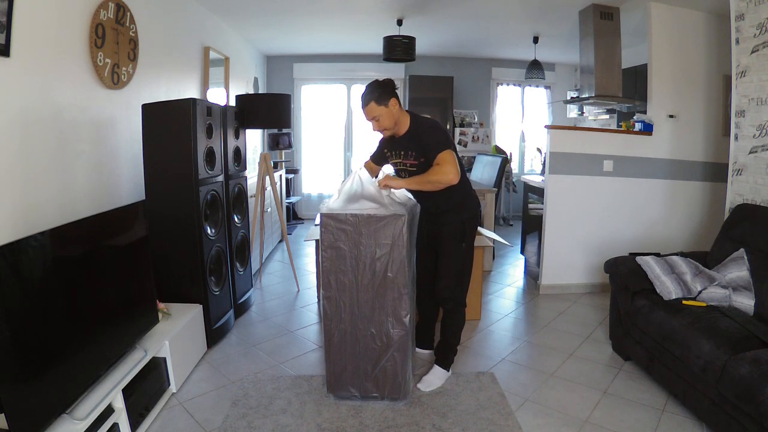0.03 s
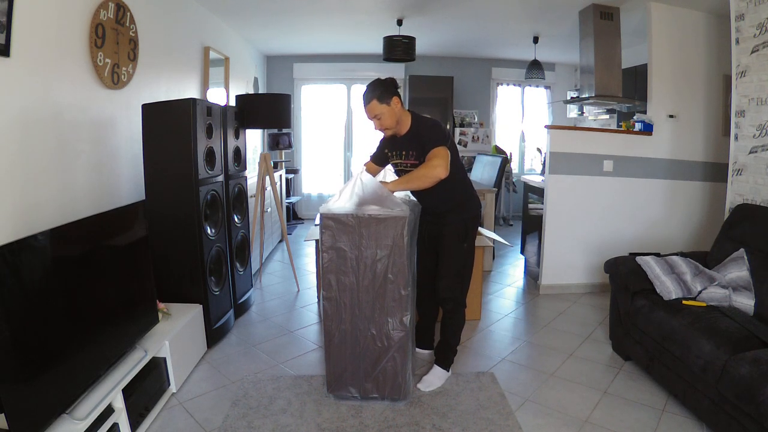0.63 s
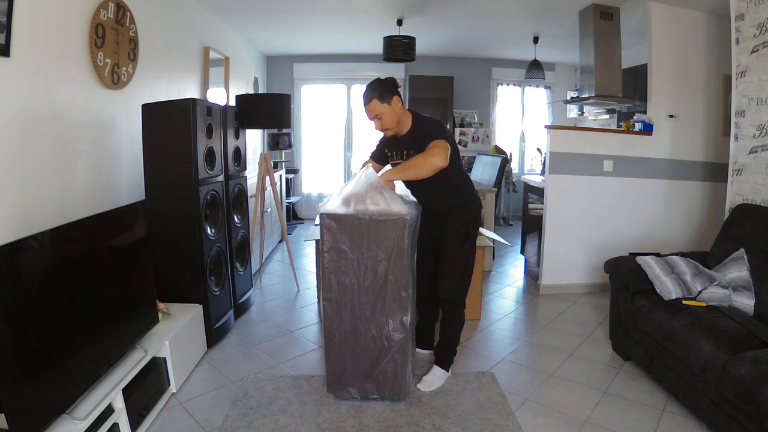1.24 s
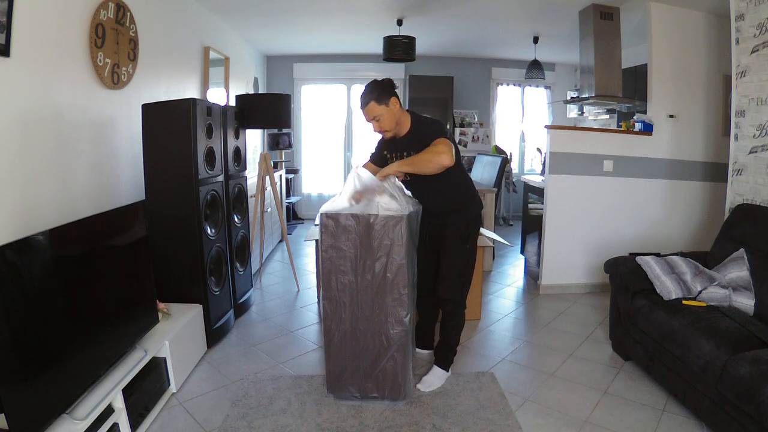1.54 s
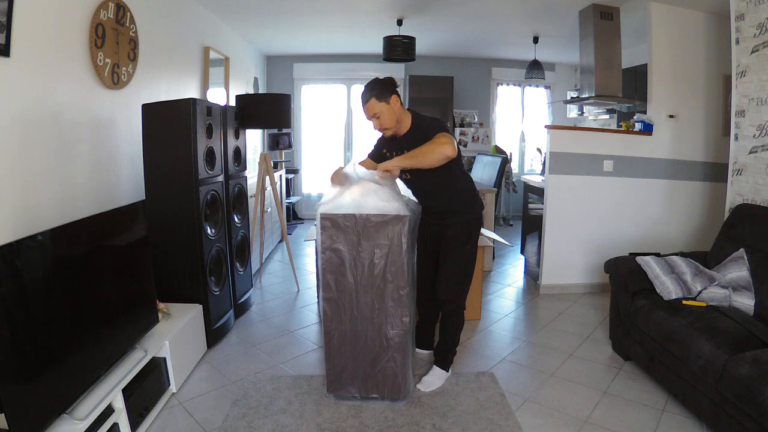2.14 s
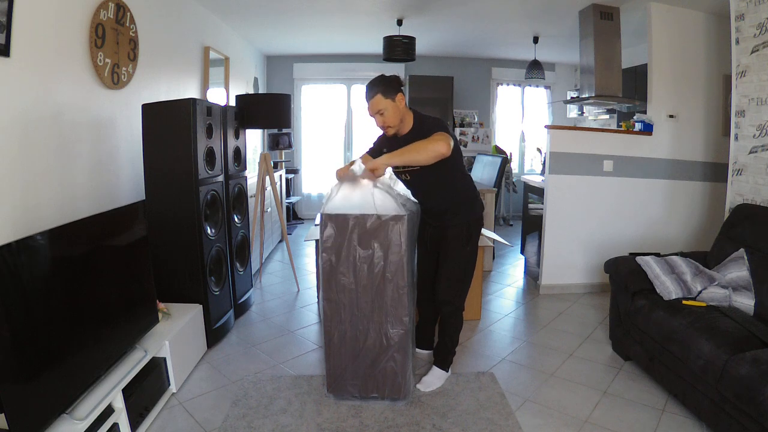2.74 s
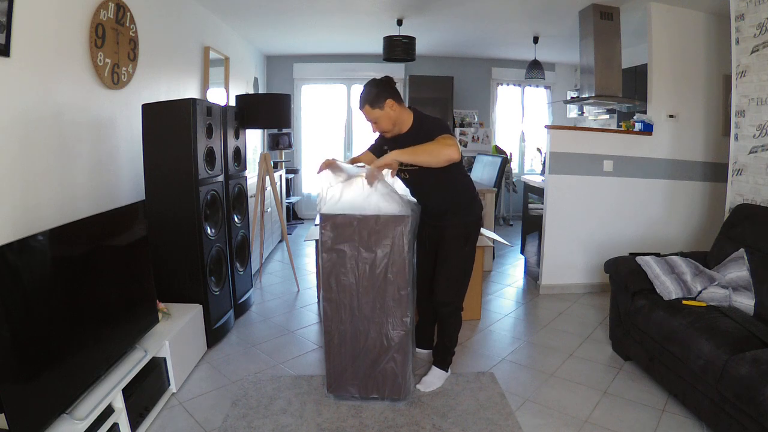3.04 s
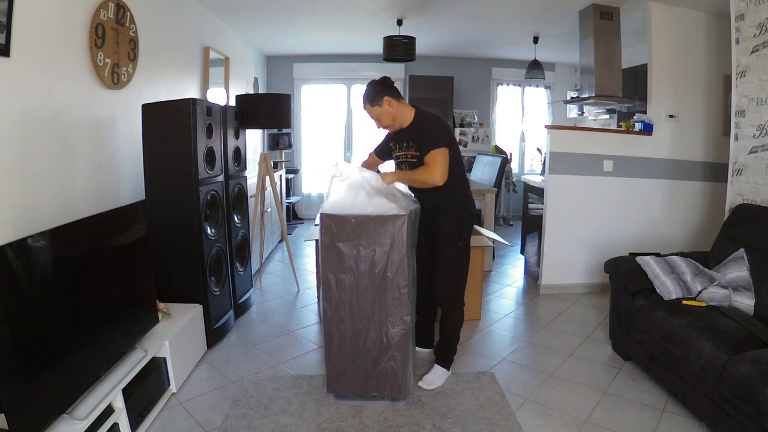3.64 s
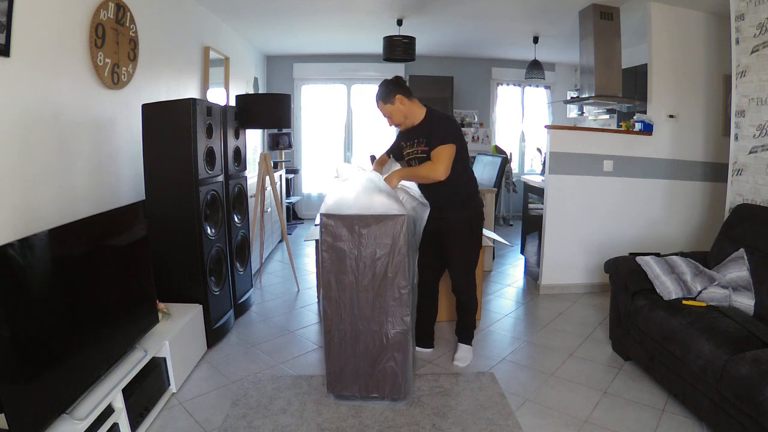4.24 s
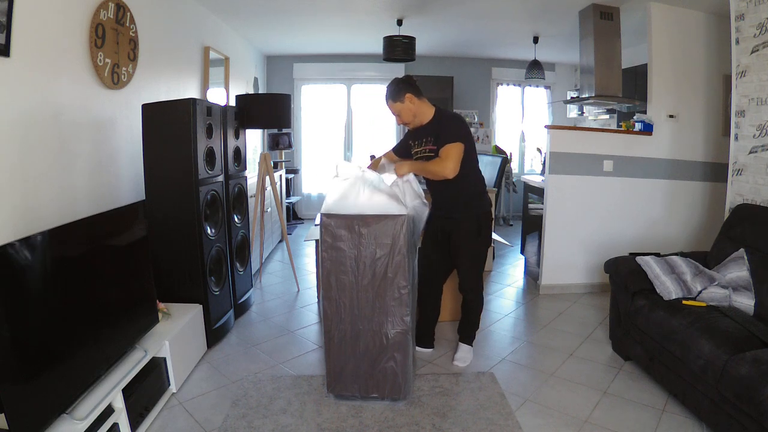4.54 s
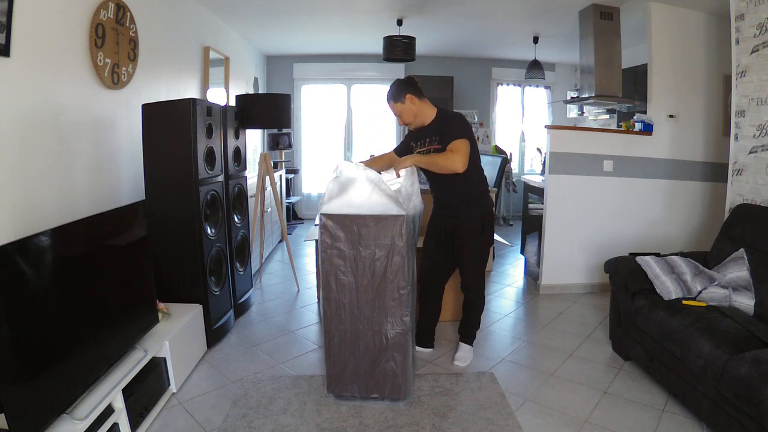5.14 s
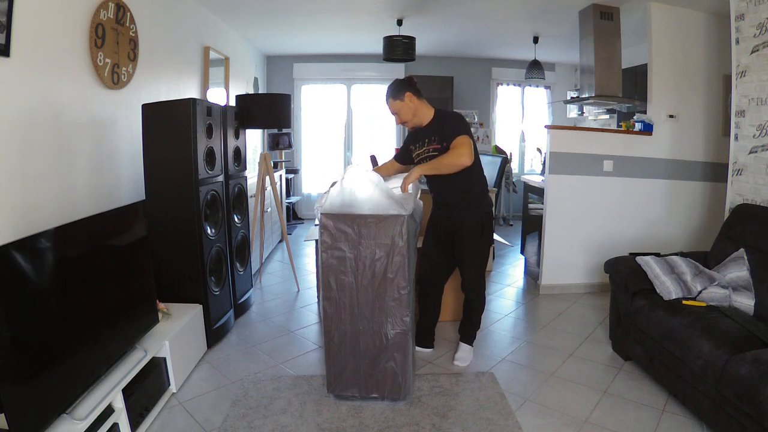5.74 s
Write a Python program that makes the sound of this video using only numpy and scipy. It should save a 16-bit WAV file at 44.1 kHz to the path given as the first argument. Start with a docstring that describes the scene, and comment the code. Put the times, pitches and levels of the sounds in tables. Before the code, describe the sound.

Thin plastic wrap is tugged off a tall cabinet in about nine uneven pulls. Each one swells into a crinkly swish with a soft flutter of loose sheet, then settles. Short crunches and sharp crease pops come in between as fingers grab the film, with the loudest snap near the middle. The microphone is a few metres away in a lightly echoing tiled living room.

```python
"""Plastic wrap pulled off a cabinet

Thin wrap is tugged off a tall cabinet in repeated pulls, a few metres away in a tiled living room.
Each pull buckles hundreds of creases, slides film over film and flutters the loose sheet;
in between, fingers grab the wrap with short crunches. The room smears it all into swishes."""
import sys
import numpy as np
from scipy import signal
from scipy.fft import rfft, irfft
from scipy.io import wavfile
from scipy.ndimage import uniform_filter1d

SR = 44100
rng = np.random.default_rng(int(sys.argv[2]) if len(sys.argv) > 2 else 0)


def unload_wav(signal):
    """Save mono or channel-first audio to the path in sys.argv[1] as 16-bit WAV at rate SR, clipped to [-1, 1]."""
    wavfile.write(
        sys.argv[1],
        SR,
        np.round(np.clip(np.atleast_2d(signal).T, -1, 1) * 32767).astype(np.int16),
    )


N = 260013
LEAD = SR // 5  # pre-roll: first pull under way and room ringing at time zero
TIME = np.arange(-LEAD, N) / SR
SPAN = len(TIME)

# snapping-crease spectrum: freq_hz, level_db
CREASE_SPECTRUM = [(150, -28.5), (700, -15.5), (1400, -4.5), (2200, -1), (4500, 0), (6500, -1.5),
                   (9500, -0.5), (12500, -6.5), (16000, -14)]


def gain_of(db):
    return np.exp(np.asarray(db) * (np.log(10) / 20))


def unit_rms(x):
    return x / np.sqrt(np.mean(x ** 2) + 1e-20)


def curve_at(points, hz):
    freq_hz, value = np.transpose(points)
    return np.interp(np.log(hz + 1), np.log(freq_hz + 1), value)


def add(mix, start_s, sound):
    part = mix[LEAD + round(start_s * SR):][:len(sound)]
    part += sound[:len(part)]


def tint(x, spectrum, size=4096):
    """Minimum-phase filter; white noise keeps its power."""
    log_gain = np.log(gain_of(curve_at(spectrum, abs(np.fft.fftfreq(size, 1 / SR)))))
    taps = np.fft.ifft(np.exp(np.conj(signal.hilbert(log_gain)))).real[:size // 2]
    return signal.oaconvolve(x, taps / np.linalg.norm(taps))[:SPAN]


def crackle(per_s, spread_db, limit=4.8):
    """Random clicks of mean power 1, most small, a few large."""
    chance = np.clip(per_s / SR, 1e-5, 1)
    strength = unit_rms(gain_of(spread_db * np.minimum(rng.exponential(1, SPAN), limit)))
    return strength * rng.choice([-1, 1], SPAN) * (rng.random(SPAN) < chance) / np.sqrt(chance)


def flicker(depth_db, per_s):
    """Wandering gain of mean power 1."""
    steps = np.arange(SPAN)
    return unit_rms(gain_of(depth_db * np.interp(steps * per_s / SR, steps, rng.standard_normal(SPAN))))


def pull_phases(grip_rise_s=0.012, swell_s=0.057, release_s=0.031, stop_s=0.032, settle_db_per_s=26):
    """Hands tension the film, tug, let it settle. Yields envelope, treble_db, flutter_db per phase."""
    # hand pulls: grip_s, tug_s, rest_s, hold_s, grip_db, taut_db, tug_db, slack_db,
    # tense_treble_db, tug_treble_db, tug_flutter_db
    pulls = [(-0.2, -0.031, 0.238, 0.019, -46, -22.5, -24.5, -35.3, 1.5, -1, -10),
             (0.375, 0.853, 1.083, 0.065, -48, -31, -29.5, -35.5, 0.2, 0.5, -5.5),
             (1.166, 1.471, 1.93, 0.1, -37, -42, -36.5, -37.5, -1.5, 2.5, -6.5),
             (1.862, 2.009, 2.48, 0.043, -42.5, -36, -25, -39, 1, 1.5, -5.5),
             (2.518, 2.839, 3.33, .016, -40.5, -35, -23, -38, 3.2, 2.7, -10),
             (3.355, 3.708, 4.02, 0.047, -43, -29, -28.5, -38, 2.5, -2.5, -9.5),
             (4.074, 4.556, 4.808, .04, -41.5, -35.5, -26.5, -35, 2.5, 3.2, -6),
             (4.789, 4.851, 5.15, 0.05, -32.5, -37, -33, -40, 3, 3, -8),
             (5.323, 5.515, 5.823, 0.05, -40.5, -40.5, -27.5, -38.5, -3, 1.5, -9.5)]
    for (grip_s, tug_s, rest_s, hold_s, grip_db, taut_db, tug_db, slack_db,
         tense_treble_db, tug_treble_db, tug_flutter_db) in pulls:
        before_s, after_s = np.maximum(tug_s - TIME, 0), np.maximum(TIME - tug_s - hold_s, 0)
        gripped = 1 - np.exp(-np.maximum(TIME - grip_s, 0) / grip_rise_s)
        held = np.exp(-after_s / release_s)
        moving = np.exp(-np.maximum(TIME - rest_s, 0) / stop_s)
        tension = gain_of(np.interp(TIME, [grip_s, tug_s], [grip_db, taut_db]))
        yield gripped * held * tension, tense_treble_db, -6
        yield np.exp(-before_s / swell_s) * held * gain_of(tug_db), tug_treble_db, tug_flutter_db
        yield (1 - held) * moving * gain_of(slack_db - settle_db_per_s * after_s), -1.2, -6.5


def pull_levels_db():
    """Power sum of all phases: crinkle, its treble, loose sheet."""
    power = sum((gain_of([[0], [treble_db], [flutter_db]]) * envelope) ** 2
                for envelope, treble_db, flutter_db in pull_phases())
    return 10 * np.log10(power + 1e-12)


def pull_rustle(slide_db=-3, flutter_db=-0.15, creases_per_s=1500, crowding=0.7, treble_hz=8000):
    """Creases snap faster under a harder pull; film hisses over film; broad folds flutter lower down."""
    # sliding-film spectrum: freq_hz, level_db
    film_spectrum = [(150, -32), (700, -12), (1400, -0.5), (2200, -0.5), (4500, -2.5), (6500, -3),
                     (9500, -3), (12500, -7.5), (16000, -16)]
    # loose-sheet spectrum: freq_hz, level_db
    sheet_spectrum = [(30, -20), (70, -19), (150, -14), (260, -4), (400, -3), (850, 0), (1400, -2.5),
                      (2200, -7), (5000, -32.5)]
    level_db, treble_db, sheet_db = pull_levels_db()
    snaps = crackle(creases_per_s * gain_of(crowding * (level_db + 30)), spread_db=5.0, limit=3.93)
    slide = gain_of(slide_db) * tint(rng.standard_normal(SPAN), film_spectrum)
    crinkle = tint(snaps, CREASE_SPECTRUM) + slide
    treble = signal.sosfiltfilt(signal.butter(2, treble_hz, "high", fs=SR, output="sos"), crinkle)
    lift_db = treble_db - level_db + 0.11 * (level_db + 39.5)  # taut film snaps more sharply
    crinkle += (gain_of(lift_db) - 1) * treble
    flutter = gain_of(sheet_db + flutter_db) * tint(crackle(per_s=2500, spread_db=3.5), sheet_spectrum)
    return flicker(depth_db=3.0, per_s=140) * (gain_of(level_db) * crinkle + flutter)


def grab_crunches(gain_db=3, rise_s=0.0037, decay_s=0.017):
    """A grab or a yielding fold sets off a short avalanche of creases."""
    # grabs and yielding folds: start_s, level_db
    grabs = [(0.119, -32), (0.387, -40), (0.475, -36), (0.502, -41), (0.529, -30.5), (0.639, -30),
             (0.745, -25.5), (0.868, -23.5), (1.39, -19.5), (1.471, -22), (1.661, -32), (1.712, -30),
             (1.853, -35.5), (1.92, -40), (2.311, -35.5), (2.532, -31), (2.807, -16.5), (2.855, -20),
             (3.113, -33.5), (3.31, -37), (3.496, -23), (3.518, -24), (3.59, -28), (3.715, -24),
             (4.062, -34), (4.112, -30.5), (4.251, -32), (4.511, -23.5), (4.802, -22), (5.265, -37),
             (5.338, -28), (5.46, -27), (5.565, -22)]
    power, t = np.zeros(SPAN), np.arange(SR // 4) / SR
    for start_s, level_db in grabs:
        envelope = gain_of(level_db) * (1 - np.exp(-t / rise_s)) * np.exp(-t / decay_s)
        add(power, start_s, envelope ** 2)
    return gain_of(gain_db) * tint(np.sqrt(power) * crackle(per_s=4000, spread_db=2.5), CREASE_SPECTRUM)


def crease_pops(loud_gain_db=1.0, small_db=-53.5, small_per_s=110, follow=0.79):
    """Stiff near-side creases pop singly: a few loud, small ones while the film moves."""
    # loud pops: start_s, level_db
    loud_pops = [(0.127, -12.5), (0.534, -15), (0.662, -18), (1.398, -18), (1.619, -19), (1.664, -11.5),
                 (1.854, -21), (2.341, -29), (2.417, -20), (2.752, -13), (2.8586, -2), (3.116, -21),
                 (4.057, -16.5), (5.344, -27)]
    # single-pop spectrum: freq_hz, level_db
    pop_spectrum = [(200, -43), (1500, -2), (5000, -2.5), (8500, 3.5), (12500, 0.5), (16000, -17)]
    pull_db = pull_levels_db()[0]
    envelope = gain_of(small_db + follow * (pull_db - np.median(pull_db)))
    pops = envelope * crackle(small_per_s, spread_db=5.0, limit=2.4)
    for start_s, level_db in loud_pops:
        add(pops, start_s, gain_of([level_db + loud_gain_db]))
    return tint(pops, pop_spectrum)


def sheet_flaps(width_oct=0.46, size=8192):
    """A stretch of sheet jerked taut gives a papery thud, lower for a larger stretch."""
    # jerks of the sheet: start_s, level_db, pitch_hz, decay_s
    jerks = [(.018, -25.5, 850, 0.011), (2.002, -38, 1400, 0.01), (2.025, -52, 325, 0.025),
             (2.817, -31, 295, 0.013), (2.860, -31, 240, 0.011), (2.867, -49, 54.7, 0.012),
             (3.658, -26.5, 1350, 0.015), (3.68, -23, 1040, .008), (3.702, -20, 650, 0.0072),
             (3.722, -26, 910, 0.0033), (4.802, -37, 440, 0.019), (5.342, -47, 501.5, 0.036),
             (5.525, -38, 313, 0.033)]
    flaps = np.zeros(SPAN)
    hz, t = np.fft.rfftfreq(size, 1 / SR) + 1, np.arange(size) / SR
    for start_s, level_db, pitch_hz, decay_s in jerks:
        band = np.exp(-0.5 * (np.log2(hz / pitch_hz) / width_oct) ** 2)
        noise = unit_rms(irfft(band * np.exp(2j * np.pi * rng.random(len(hz)))))
        add(flaps, start_s, gain_of(level_db) * noise * np.exp(-t / decay_s))
    return flaps


def room_tail(size, rise_s=0.0018):
    """Diffuse stereo reverberation, about unit energy per side."""
    # room decay: freq_hz, t60_s
    decay_times = [(100, 0.36), (400, 0.43), (1500, .49), (4000, 0.5), (8000, 0.42), (16000, 0.29)]
    # left-right likeness of the tail: freq_hz, correlation
    correlations = [(50, 0.49), (300, 0.52), (2000, 0.57), (5200, 0.52), (7500, 0.056), (9500, -0.01),
                    (11500, -0.2), (16000, -0.34)]
    hz, t, (left, spare) = signal.stft(rng.standard_normal((2, size)), SR, nperseg=256)
    alike = curve_at(correlations, hz)[:, None]
    right = alike * left + np.sqrt(1 - alike ** 2) * spare
    decay = gain_of(-60 * t / curve_at(decay_times, hz)[:, None])
    tail = signal.istft(np.array([left, right]) * decay, SR, nperseg=256)[1][:, :size]
    tail *= 1 - np.exp(-np.arange(size) / SR / rise_s)
    return tail / np.linalg.norm(tail[0])


def room_response(direct_db=-8, early_db=-9, early_span_s=0.016, skew_s=0.00015, echoes=8, size=32768):
    """Stereo path from one spot on the wrap: direct sound, floor and wall reflections, tail."""
    # room resonances: freq_hz, width_hz, lift_db
    modes = [(91.5, 12.5, 7.5), (255, 14, 2.5), (380, 44, 4), (542, 20, 3), (742, 7.7, 0.5), (887, 31, 5),
             (1225, 30, 3.5), (1590, 19, 0.5)]
    hz, channels = np.fft.rfftfreq(size, 1 / SR), np.array([[-0.5], [0.5]])
    path = rfft(room_tail(size)) + gain_of(direct_db)
    for lateness, side in rng.random((echoes, 2)):
        delay_s = 0.002 + early_span_s * lateness + channels * skew_s * (2 * side - 1)
        path += gain_of(early_db) / np.sqrt(echoes) * np.exp(-2j * np.pi * hz * delay_s)
    modes_db = sum(lift_db / (1 + (2 * (hz - freq_hz) / width_hz) ** 2)
                   for freq_hz, width_hz, lift_db in modes)
    return irfft(path * gain_of(modes_db))


def room(x, gain_db=-1.5, hops_per_s=120, spots=10, fade_samples=200):
    """The crinkling hops at random between spots on the wrap, each with its own echoes."""
    hops = np.cumsum(rng.random(SPAN) < hops_per_s / SR)
    spot = rng.integers(0, spots, SPAN)[hops]
    shares = np.array([uniform_filter1d((spot == k) * 1.0, fade_samples) for k in range(spots)])
    shares /= np.linalg.norm(shares, axis=0)  # equal-power crossfade
    arrivals = (signal.oaconvolve((x * share)[None], room_response(), axes=1) for share in shares)
    return gain_of(gain_db) * sum(arrivals)[:, :SPAN]


def house_noise(level_db=-55.0, width=0.52, rumble_hz=110):
    """Faint hiss of the still house over a wavering rumble."""
    # still-house spectrum: freq_hz, level_db
    house_spectrum = [(5, -1), (16, 7), (37, -5), (75, -17), (95, -15), (120, -18), (400, -19.5),
                      (1500, -30), (6000, -62), (16000, -68)]
    mid, side = (tint(rng.standard_normal(SPAN), house_spectrum, size=16384) for _ in range(2))
    air = np.array([mid + width * side, mid - width * side])
    rumble = signal.sosfiltfilt(signal.butter(2, rumble_hz, fs=SR, output="sos"), air)
    return gain_of(level_db) * (air + (flicker(depth_db=0.6, per_s=3.8) - 1) * rumble)


def scene(near_db=-4, balance_db=0.08):
    """Wrap in the room over house noise; near-side pops get extra direct sound."""
    pops = crease_pops()
    wrap = room(pull_rustle() + grab_crunches() + sheet_flaps() + pops) + gain_of(near_db) * pops
    return (wrap * gain_of([[balance_db], [-balance_db]]) + house_noise())[:, LEAD:]


def record(dry):
    """Steep low-pass."""
    cutoff_hz = 15900
    taps = signal.firwin(511, cutoff_hz, window=("kaiser", 9), fs=SR)
    return signal.oaconvolve(dry, taps[None], "same")


dry = scene()
out = record(dry)
unload_wav(out)
```